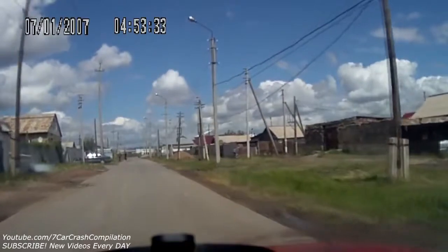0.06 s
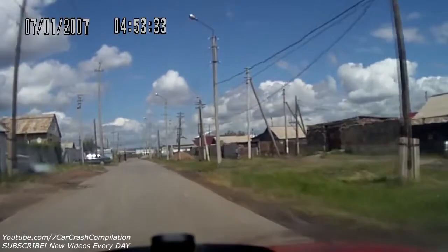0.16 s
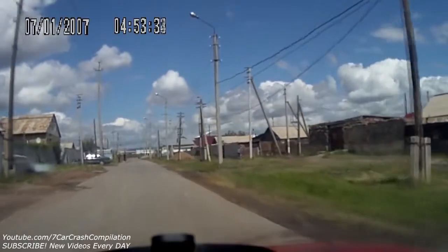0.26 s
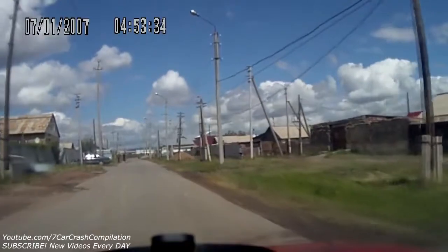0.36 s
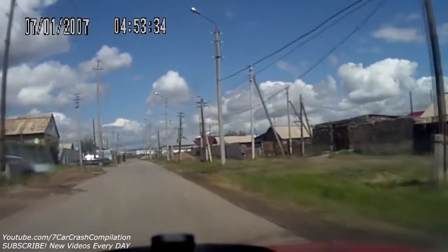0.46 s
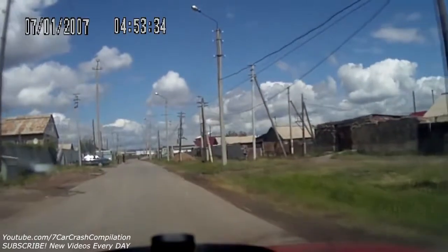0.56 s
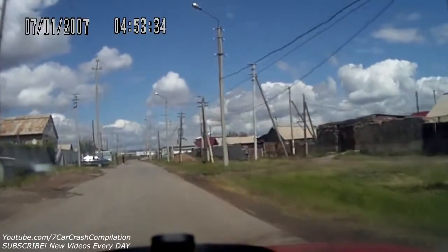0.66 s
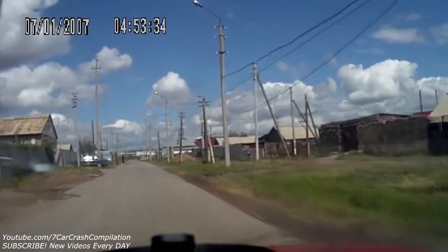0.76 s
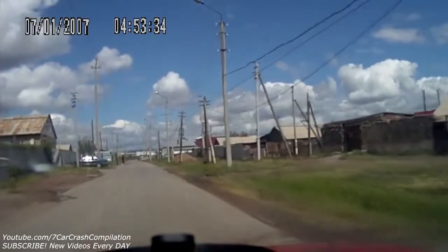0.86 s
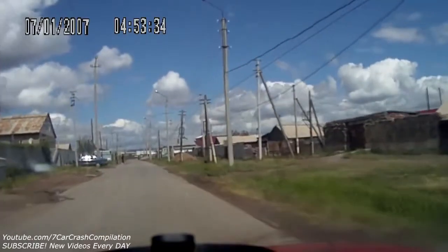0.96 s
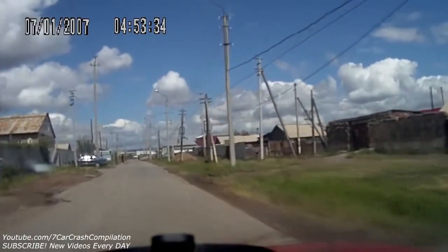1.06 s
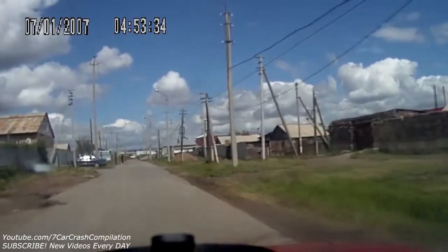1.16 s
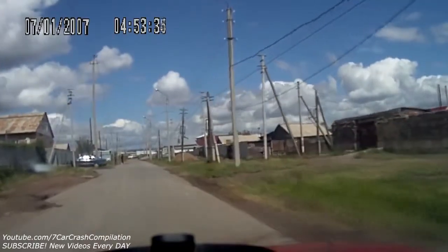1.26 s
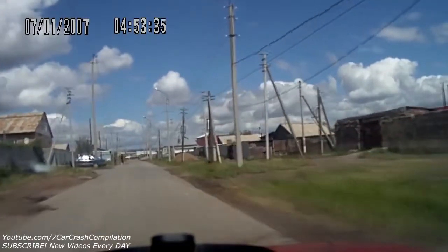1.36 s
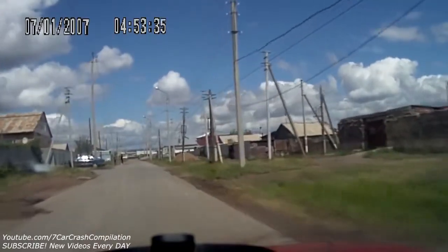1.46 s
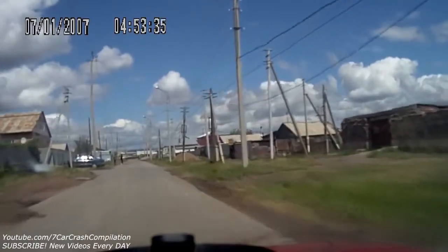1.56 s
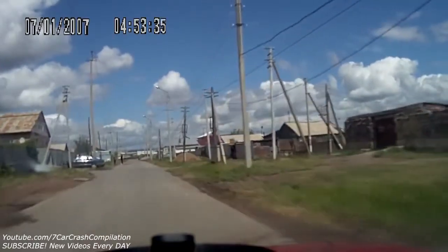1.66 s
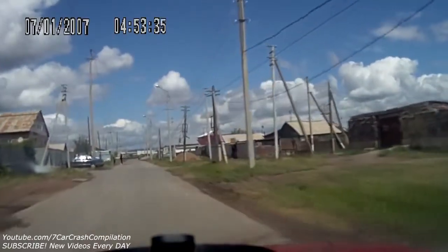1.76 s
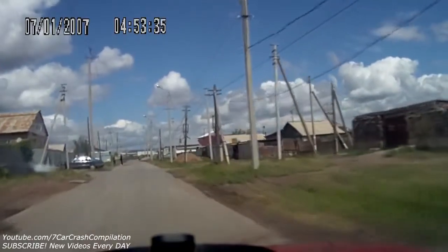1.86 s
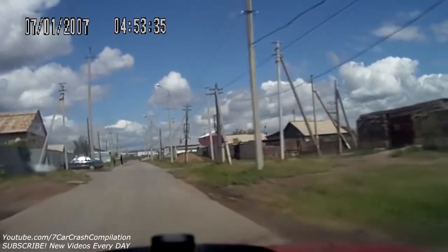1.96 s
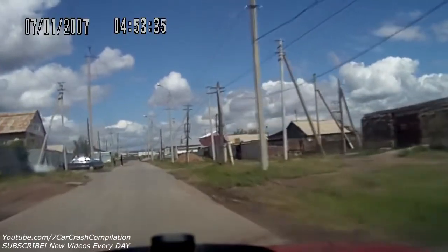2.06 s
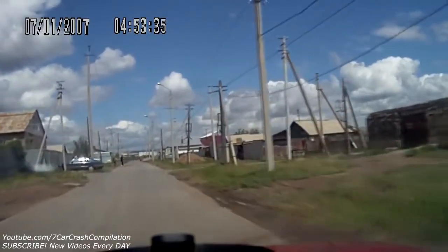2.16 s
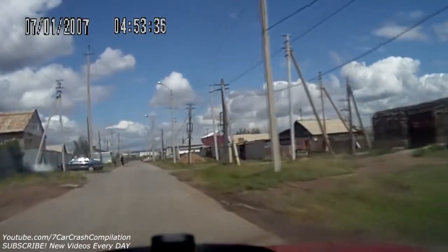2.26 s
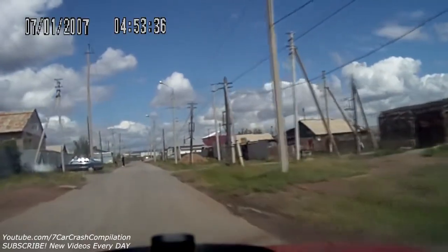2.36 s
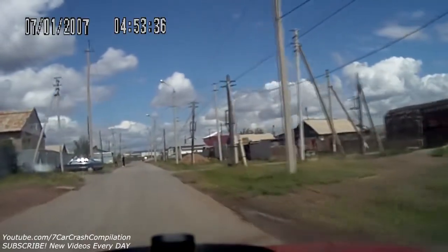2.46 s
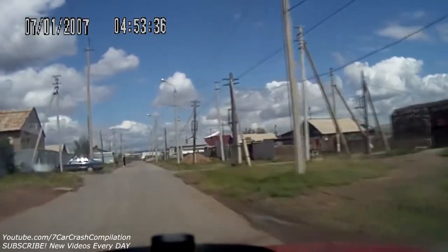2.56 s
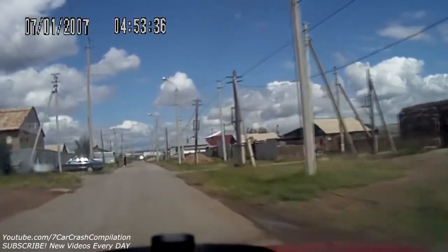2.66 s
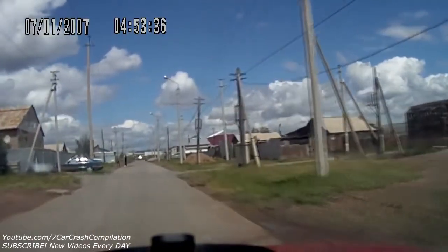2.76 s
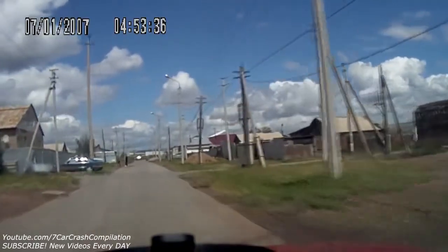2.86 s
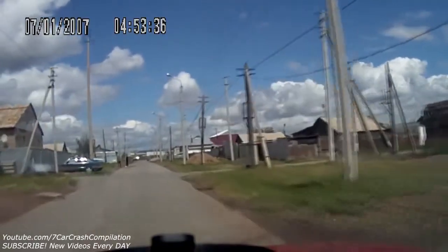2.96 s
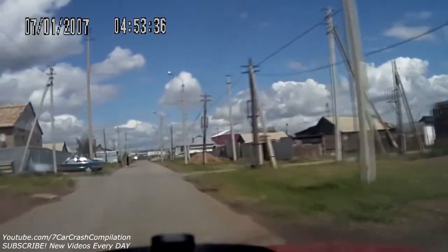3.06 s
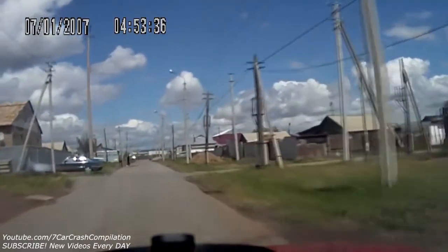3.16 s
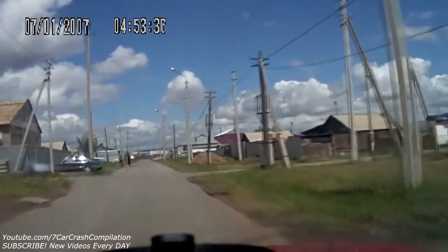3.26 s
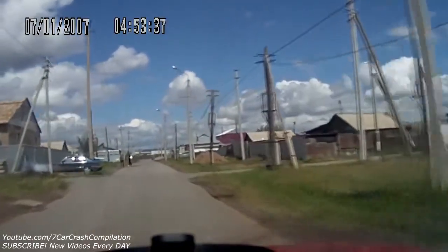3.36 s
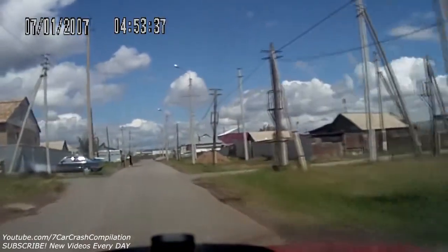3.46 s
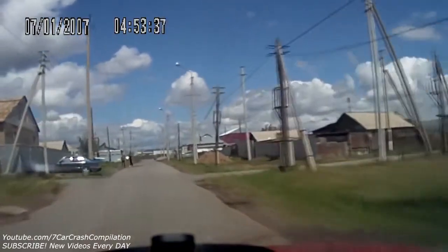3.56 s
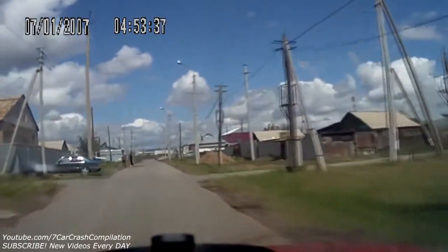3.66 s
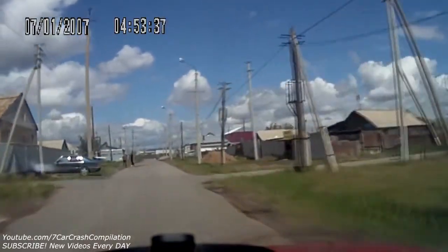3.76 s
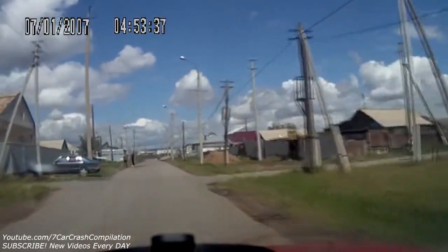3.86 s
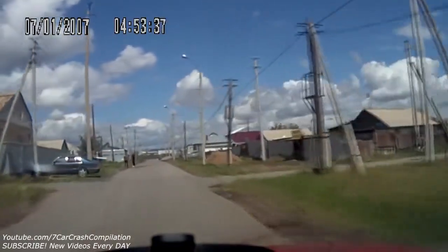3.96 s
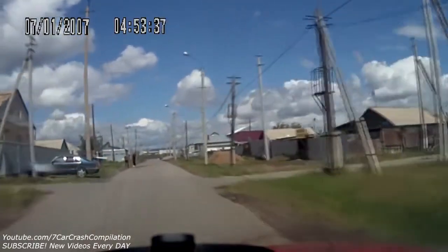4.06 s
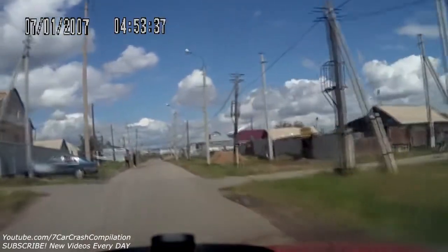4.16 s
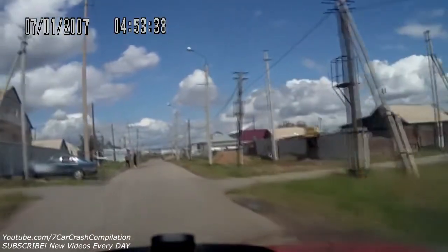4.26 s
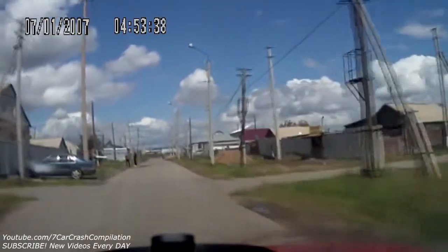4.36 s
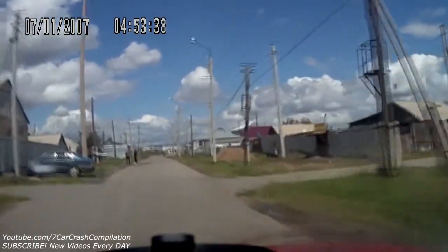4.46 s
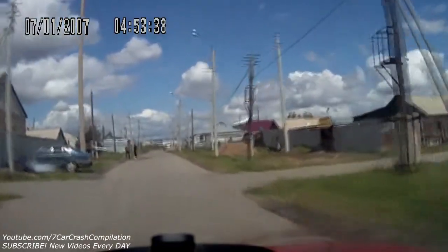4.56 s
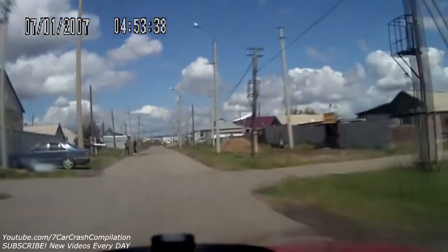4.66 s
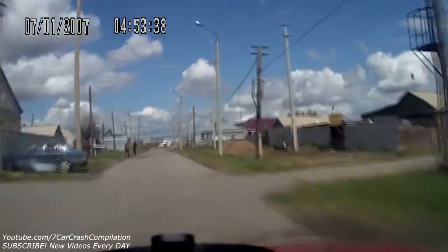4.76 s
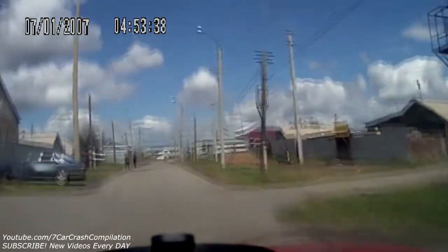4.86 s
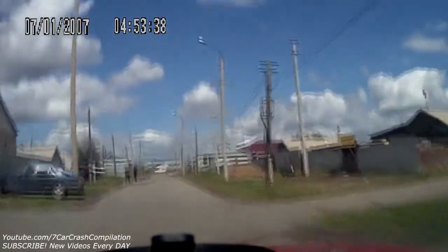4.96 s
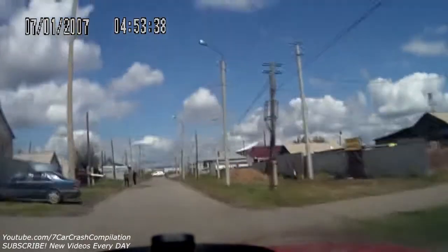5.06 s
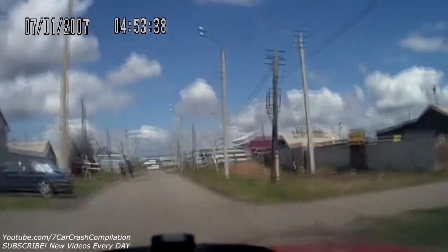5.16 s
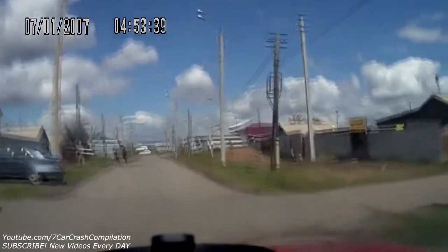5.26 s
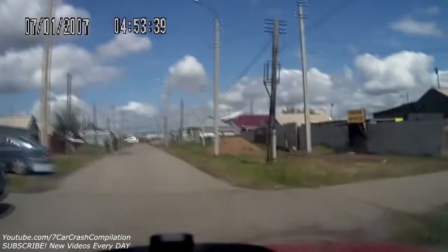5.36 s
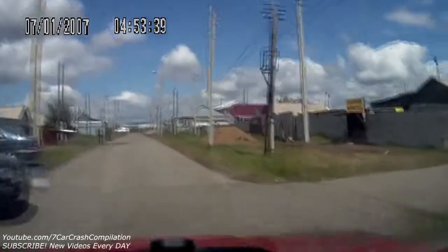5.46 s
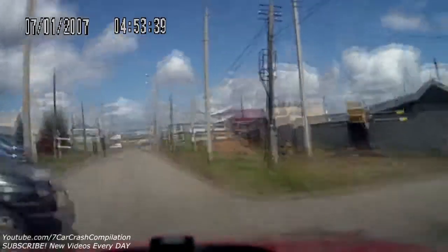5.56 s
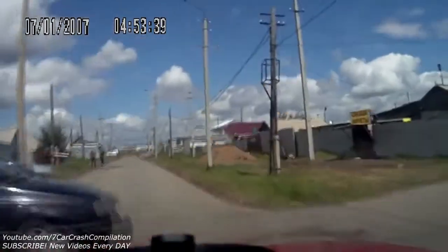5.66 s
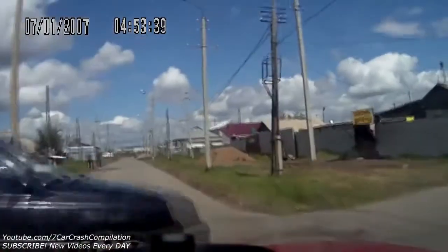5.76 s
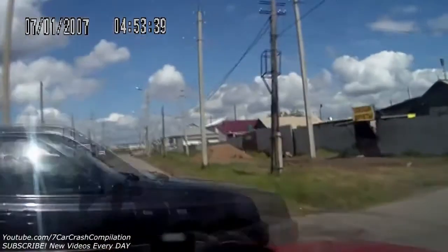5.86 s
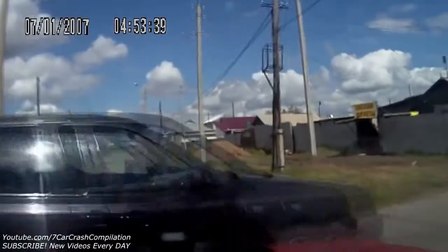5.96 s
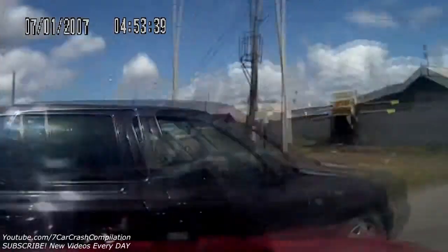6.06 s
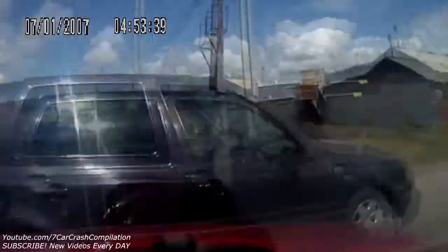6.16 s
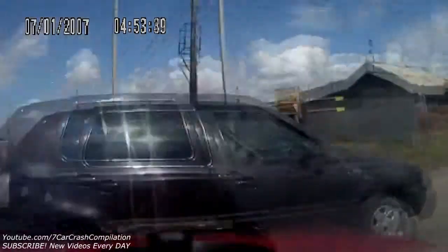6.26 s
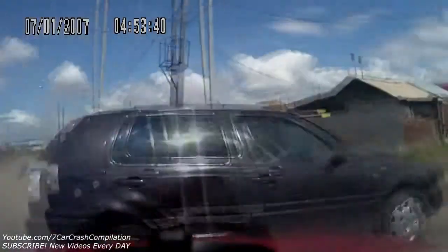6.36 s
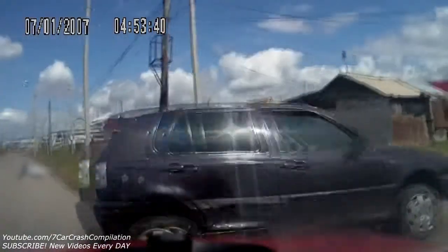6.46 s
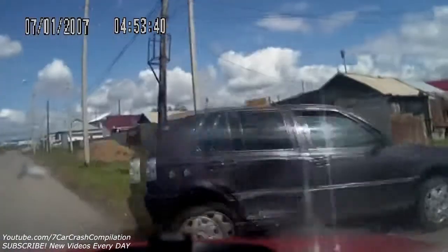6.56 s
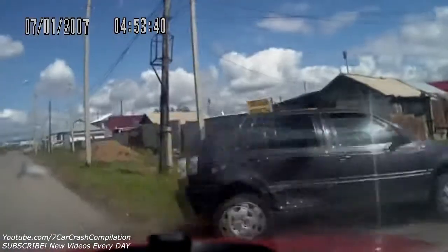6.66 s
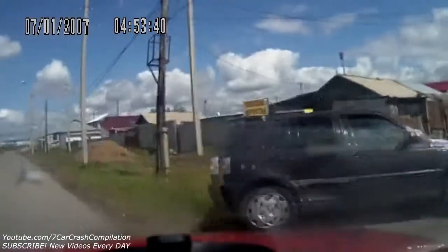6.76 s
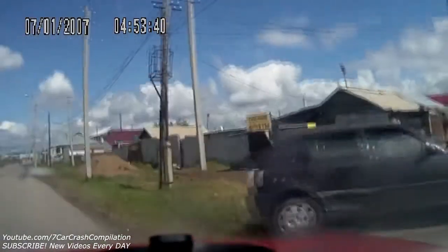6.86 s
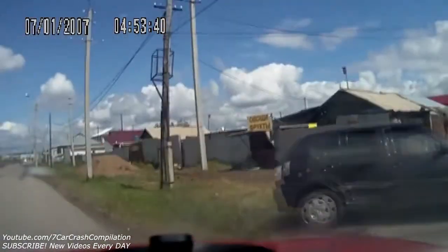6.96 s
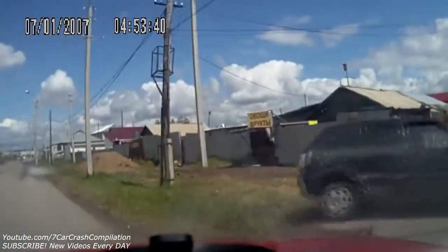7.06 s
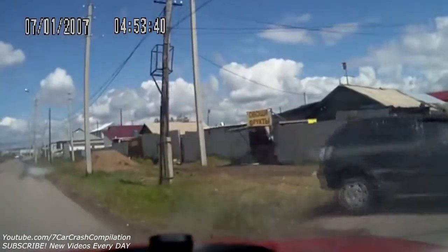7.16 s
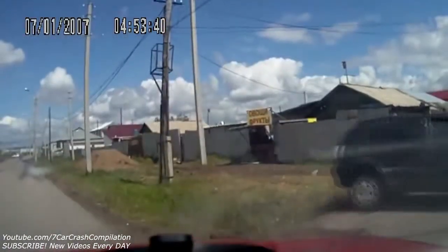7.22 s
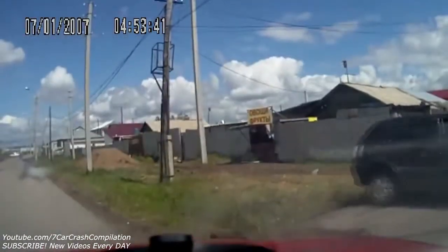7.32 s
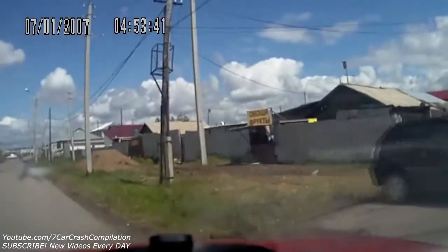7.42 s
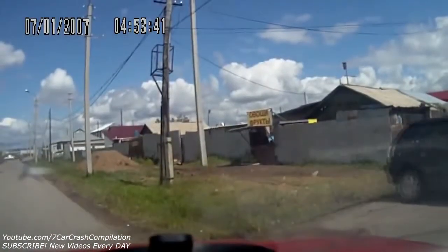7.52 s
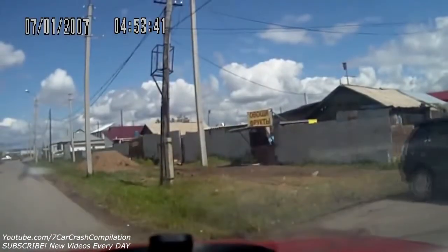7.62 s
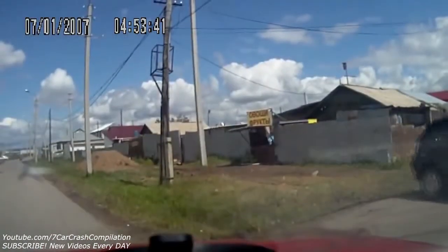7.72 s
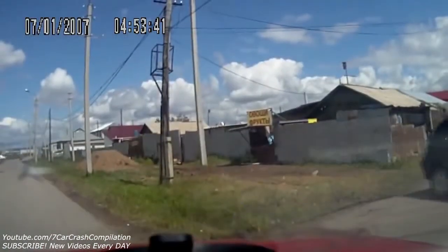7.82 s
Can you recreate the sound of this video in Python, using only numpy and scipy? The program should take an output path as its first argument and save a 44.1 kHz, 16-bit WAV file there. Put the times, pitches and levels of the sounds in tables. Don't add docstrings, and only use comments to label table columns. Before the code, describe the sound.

A droning four-cylinder engine revs higher with ticking trim, tyres scrub, sheet metal thuds and snaps, then only a weak stumbling idle remains.

```python
import sys
import numpy as np
from scipy import signal
from scipy.fft import rfft, irfft
from scipy.io import wavfile
from scipy.ndimage import uniform_filter1d

SR = 44100
rng = np.random.default_rng(int(sys.argv[2]) if len(sys.argv) > 2 else 0)


def how_loud(loudness_db):
    steps = np.asarray(loudness_db, float) / 20
    return 10 ** steps


def master_out(mix):
    frames = np.transpose(np.atleast_2d(mix))
    ceiling = np.clip(frames, -1, 1)
    pcm = np.round(ceiling * 32767).astype(np.int16)
    wavfile.write(sys.argv[1], SR, pcm)


N = 347895
TIME = np.arange(N) / SR


def engine():
    turn = [(58, 1.9, .9), (63, 2.5, 2.1), (66, 2.9, 3.7), (70, 4.2, 3.2), (78, 4.2, 3.4), (82, 3.8, 3.5),
            (87, 3.4, 3.5), (94, 4.5, 4.5)]
    # multiple, level_db (over the second multiple)
    upper = [(4, -26), (5, -20), (6, -23), (7, -25), (8, -29), (9, -36)]
    # multiple (of the firing rate), start_s, end_s, level_db
    whines = [(11.8, .95, 1.25, -56), (11.75, 1.15, 1.95, -58), (11.7, 1.75, 2.05, -52),
              (11.4, 1.98, 2.25, -50), (11.5, 2.2, 2.5, -59), (11, 2.35, 2.8, -58), (12, 2.35, 2.8, -58),
              (6.03, 3.2, 5.08, -51), (2.315, 3.3, 5.15, -38.5), (23, 2.9, 3.5, -65),
              (22.9, 1.85, 2.3, -61)]
    cabin_hz, cabin_width_hz = 208, 14

    firing_hz, first_db, second_db, uneven_db = driver()
    phase = 2 * np.pi * np.cumsum(firing_hz * (1 + .0015 * walk(12))) / SR
    turn_hz, second_rad, third_rad = np.transpose(turn)
    turn2 = np.interp(firing_hz, turn_hz, second_rad)
    turn3 = np.interp(firing_hz, turn_hz, third_rad)

    lump_db = (.4 + 3.0 * np.minimum(how_loud(uneven_db - first_db), .6)) * walk(20)
    out = how_loud(first_db + .6 + lump_db) * np.cos(phase)
    out += how_loud(second_db + 1.5) * np.cos(2 * phase + turn2)

    resonance = 1 / (1 + ((3 * firing_hz - cabin_hz) / (cabin_width_hz / 2)) ** 2)
    swell = .3 * np.clip((88 - firing_hz) / 8, .3, 1) + resonance
    out += how_loud(first_db - 20 + 1.5 * walk(8)) * swell * np.cos(3 * phase + turn3)

    halves = np.cos(1.5 * phase) + np.cos(phase / 2) / 2 + np.cos(2.5 * phase) / 5
    out += how_loud(uneven_db + 2.5 * np.clip(walk(27), -2, 1.2) + lump_db) * halves

    strain_db = np.maximum(second_db, first_db - 28 + 14 * swell)
    for multiple, db in upper:
        level = how_loud(db + 2.0 * strain_db + 23 + 1.0 * walk(9))
        out += level * np.cos(multiple * (phase + 3.48))

    for multiple, start_s, end_s, db in whines:
        level = gate(start_s, end_s, .12) * how_loud(db + 3.5 * walk(22))
        out += level * np.sin(multiple * phase + .7 * walk(40))

    boom_db = np.maximum(second_db, -29.5 + (second_db + 28) / 2)
    buzz_level = how_loud(42 + 2.6 * boom_db + 3 * first_db + .8 * walk(70))
    strikes = np.exp(-((phase / np.pi + .12) % 1) / .2) * how_loud(9.0 * np.sin(phase / 2) ** 2)
    buzz = strikes * band(band(noise(), 3300, 2600), 3600, 9000)
    return np.sqrt(2) * out + buzz_level * unit(buzz)


def driver():
    # time_s, firing_hz
    revs = [(0, 44.57), (.3, 54.44), (.58, 66.2), (.72, 63.6), (.9, 55.6), (1.0, 58.63), (1.2, 58.9),
            (2.0, 68), (2.5, 76.9), (3.0, 82.25), (3.5, 86.75), (4.75, 92), (5.02, 94.8), (5.2, 85),
            (5.33, 87), (5.42, 78.37), (5.7, 71.76), (5.8, 63.23)]
    # firing_hz, level_db
    boom = [(44, -16.5), (54.5, -16), (59, -13.5), (62, -13), (82, -12), (88, -15.5), (95, -16.5)]
    # firing_hz, level_db
    second_answer = [(44, -29.5), (63, -27), (66, -34.5), (69, -31), (74, -25), (77.5, -21.5),
                     (80.5, -25.5), (87, -40.5), (95, -45)]
    # time_s, depth_db, half_length_s
    lifts = [
        (.9, 5, 0.11),
        (1.165, 4, 0.045),
        (5.11, 8, 0.059),
        (5.385, 6, 0.025),
        (5.48, 5.5, 0.16),
        (7.08, 11.5, 0.055),
        (7.23, 9, 0.067),
        (7.555, 9, 0.04),
        (7.752, 7, 0.03),
    ]
    clutch_s, slip_db = .36, -13
    coast_s, coast_db = 5.1, -6.5
    idle_from_s, idle_fade_s, idle_sag_hz_per_s = 6.05, .09, 6.5
    idle_db, idle_fall_db_per_s = -27, 3
    idle_second_db, idle_second_fall_db_per_s = -38, 6

    after_s = np.maximum(TIME - idle_from_s, 0)
    idle = np.minimum(after_s / idle_fade_s, 1)
    firing_hz, = curves(revs)

    first_db = np.interp(firing_hz, *np.transpose(boom)) + slip_db * (1 - gate(clutch_s, 99, .0076))
    first_db += idle * (idle_db - idle_fall_db_per_s * after_s - first_db)
    first_db -= sum(depth_db * hump for depth_db, hump in swells(lifts))

    second_db = np.interp(firing_hz, *np.transpose(second_answer)) + coast_db * gate(coast_s, 99, .1)
    idle_second = idle_second_db - idle_second_fall_db_per_s * after_s + 4.2 * walk(13)
    second_db += idle * (idle_second - second_db)

    weaker_db = np.max(boom, axis=0)[1] - first_db
    uneven_db = -43 + .6741 * weaker_db - .34 * (firing_hz - 65)
    uneven_db += idle * (first_db - 5 - uneven_db)
    return firing_hz - idle_sag_hz_per_s * np.maximum(after_s - .4, 0), first_db, second_db, uneven_db


def thuds():
    # time_s, peak_db, pitch_hz, decay_s
    body = [(5.39, -6, 133, 0.084), (5.555, -9.5, 148, 0.24), (5.689, -13, 159.6, 0.15),
            (5.801, -11, 121.5, 0.14), (6.061, -1.5, 158.6, 0.083), (6.111, -9, 146, 0.055),
            (6.208, -12.5, 124, 0.12), (6.701, -12.5, 158.2, 0.19), (6.769, -23.5, 206, 0.14),
            (3.85, -13, 28.8, 0.37), (4.2, -15, 27.7, 0.4), (6.37, -16.5, 140, 0.13),
            (6.755, -11.5, 68, 0.15), (6.59, -24.5, 208, 0.23)]
    # time_s, peak_db, pitch_hz, decay_s
    knocks = [
        (5.491, -26, 457, 0.094),
        (5.787, -16, 302, 0.091),
        (5.815, -16, 394, 0.12),
        (6.031, -0.5, 299.2, 0.15),
        (6.112, -10, 347, 0.083),
        (6.21, -14, 310, 0.072),
        (6.298, -15.5, 399, 0.096),
        (6.409, -6, 480, 0.02),
        (6.729, -13.5, 380, 0.053),
    ]
    # time_s, peak_db, pitch_hz, decay_s
    rocking = [
        (6.083, -7.5, 33.23, .7),
        (6.166, -7, 40.6, .5),
        (6.246, -9, 30, 0.4),
        (6.293, -8, 27, .5),
        (6.275, -14, 170.3, 0.12),
        (6.465, -13.5, 117, 0.13),
        (6.943, -25, 70, 0.22),
        (7.0, -20, 64.7, .12),
        (7.127, -26, 62, .1),
        (7.32, -20, 66.6, 0.13),
    ]

    def ring(rows):
        out = np.zeros(N)
        for s, db, hz, t60_s in rows:
            out += decays([s], [db], [t60_s]) * np.sin(2 * np.pi * hz * (TIME - s))
        return out

    return ring(body + knocks) * how_loud(.1 + 2.2 * walk(150)) + ring(rocking)


def crush():
    # start_s, end_s, level_db, centre_hz
    folds = [
        (6.025, 6.082, -13.5, 410),
        (6.104, 6.16, -25.5, 500),
        (6.175, 6.234, -22, 650),
        (6.285, 6.34, -26, 600),
        (6.33, 6.5, -42, 500),
        (5.7, 5.752, -36, 800),
        (5.804, 5.863, -35, 900),
        (5.887, 5.947, -36.5, 890),
    ]
    out = np.zeros(N)
    for start_s, end_s, db, hz in folds:
        crunch = band(band(grit(250, 3.1), hz, hz), hz, 2 * hz)
        out += how_loud(db) * gate(start_s, end_s, .028) * unit(crunch)
    return out


def cracks():
    # time_s, peak_db, width_ms, treble_db (over peak)
    slips = [(5.183, -45, 13, -35), (5.2123, -33, 3, -40), (5.354, -10, 3, -12.5), (5.392, -35, 25, -31),
             (5.4398, -19.5, 1.5, -20), (5.445, -21, 0.85, -23), (5.4498, -23, 3.2, -24),
             (5.462, -32.5, 36, -10.5), (5.4922, -25.5, 2.3, -29), (5.5502, -27.5, 8.3, -21),
             (5.565, -14, 0.61, -11), (5.621, -14, 1.9, -17), (5.6302, -19.5, 2, -22),
             (5.647, -18.5, 1.8, -15), (5.6578, -26, 1.77, -21), (5.64, -27, 2.4, -20),
             (5.67, -29, 2.6, -23), (5.774, -32, 2.9, -5), (5.792, -29, 13, -35)]
    # time_s, peak_db, width_ms, treble_db (over peak)
    crumples = [(6.0366, -28.5, 12.1, -7.5), (6.0562, -30, 3.2, -6), (6.0665, -21.5, 6.4, -9),
                (6.0966, -23, 1.8, -4.5), (6.1122, -23, 2.1, -17), (6.1175, -21, 3.9, -15),
                (6.133, -9, 5.8, -16), (6.1429, -9.5, 2, -8), (6.148, -8, 5.6, -20), (6.158, -22, 2.3, -9),
                (6.1855, -25, 3.9, -11), (6.199, -18, 10, -31), (6.2158, -20, 2.2, -28),
                (6.2464, -16, 1.5, -30), (6.2986, -10.5, 5.3, -26), (6.3045, -9, 1.02, -19),
                (6.3094, -3.5, 2.3, -28), (6.3143, -11.5, 4, -10), (6.355, -37, 30.4, 1),
                (6.3773, -30, 1.3, -10), (6.4081, -25, 8.6, -7.5), (6.4226, -35.5, 27, 1.5),
                (6.451, -29, 5.2, -8), (6.464, -28.5, 6, 0), (6.4724, -20.5, 4.2, -47),
                (6.4803, -21.5, 1.1, -18), (6.497, -33, 2.1, -7), (6.5186, -34, 5.1, -21)]
    # time_s, peak_db, width_ms, treble_db (over peak)
    drops = [(6.575, -42, 4.9, 1), (7.305, -59, 4.3, 5), (7.584, -47.5, 4, -2), (6.7279, -8.5, 3.6, -21),
             (6.7341, -9, 2, -29), (6.7383, -12, 1.7, -31), (6.766, -13, 0.72, -21),
             (6.7706, -13.5, 3.74, -33), (6.7772, -15.5, 2.7, -22), (6.8351, -42, 4.5, -9),
             (6.8508, -37, 24, -18), (6.88, -32, 16, -34), (6.8932, -34, 2.6, -28), (7.029, -40.5, 9, -6),
             (7.099, -41, 1.8, -6), (7.4256, -42, 11, -3.5), (7.439, -43, 3.4, -11), (7.314, -58, 2.7, 7),
             (7.632, -56, 6, 2)]
    snap_hz, snap_spread = 3200, .12

    s, db, ms, high_db = np.transpose(slips + crumples + drops)
    hz = snap_hz * np.exp(snap_spread * np.clip(rng.standard_normal(len(s)), -2, 2))
    low_db = -6 + .2088 * (db.max() - db)
    mid = band(band(grit(1500, 1.6), 2180, 1970), 2100, 2900)
    low = band(band(noise(), 550, 1500), 590, 1700)
    high = sum(band(band(noise(), top_hz, 1500), top_hz, 3600) for top_hz in (6400, 10000))

    out = bumps(s, db - 2.5, ms) * unit(mid)
    out += pings(s, db - 6.5, ms, hz, 850)
    out += bumps(s, db + low_db - .6, 1.35 * ms) * unit(low)
    return out + bumps(s, db + high_db - .6, ms) * unit(high)


def metal():
    # pitch_hz, start_s, end_s, level_db
    rings = [
        (1690, 6.16, 6.5, -35),
        (1782, 6.2, 6.48, -37),
        (3644, 6.23, 6.28, -43),
        (4718, 6.19, 6.49, -44),
        (4718, 6.195, 6.3, -37),
        (7375, 6.18, 6.3, -45),
        (3700, 7.02, 7.042, -41),
        (3520, 4.178, 4.204, -56),
        (3450, 4.935, 4.96, -55),
        (12550, 6.49, 6.535, -55),
    ]
    out = np.zeros(N)
    for hz, start_s, end_s, db in rings:
        out += gate(start_s, end_s, .013) * how_loud(db + 2.0 * walk(90)) * np.sin(2 * np.pi * hz * TIME)
    return out


def ticks():
    # time_s, peak_db, resonance_hz, width_ms
    trim = [(0.1604, -38, 2900, 2.4), (0.167, -41, 3200, 1.4), (0.179, -48, 3980, 5),
            (0.212, -56, 2000, 6.2), (0.337, -47, 2120, 3.4), (1.017, -51, 4500, 2),
            (3.514, -52, 5500, 1.5), (4.043, -54, 3800, 5.15), (1.563, -48.5, 4000, 3),
            (1.1693, -40, 3800, 2.5), (1.275, -55, 4000, 8), (1.6409, -43, 2800, 2.7),
            (1.659, -45, 4500, 2.2), (1.773, -52, 4860, 5), (1.7841, -40, 2700, 10),
            (1.799, -41, 2192, 2.5), (1.9035, -42.5, 3900, 1.8), (1.9604, -48, 2500, 2.26),
            (2.3249, -43, 1688, 3.8), (2.779, -51, 2515, 3.1), (2.8052, -45, 3480, 2.1),
            (2.8299, -47, 2600, 2.9), (2.9414, -46, 3200, 2.26), (3.58, -55, 4000, 22),
            (3.609, -54.5, 4000, 12), (3.8363, -45, 4010, 3.4), (3.922, -49, 3900, 6.7),
            (4.13, -60.5, 2500, 4.06), (4.6112, -51, 5024, 6.3), (4.7914, -49, 2970, 3.24),
            (4.87, -50.5, 3100, 4.9), (4.9457, -49.5, 3300, 5.8), (5.395, -32, 2300, 14),
            (5.444, -23.5, 1250, 5.5)]
    # time_s, peak_db
    taps = [
        (0.11, -48),
        (0.27, -49),
        (0.2994, -55),
        (0.3257, -50),
        (0.3839, -46.5),
        (0.4713, -51.5),
        (0.4809, -49),
        (0.5173, -49),
        (1.705, -49),
    ]
    # time_s, peak_db, resonance_hz
    clunks = [(0.159, -40, 867), (0.21, -38.5, 896), (0.47, -40, 638), (0.517, -40.5, 622),
              (1.512, -43, 735), (1.703, -41, 668), (2.74, -38, 719), (2.778, -39, 676),
              (2.963, -37.5, 694), (3.851, -39, 600), (3.884, -38, 921), (4.129, -45, 659),
              (4.789, -38, 684), (5.388, -25.5, 1030), (5.754, -28, 764), (6.516, -23.5, 756),
              (6.892, -28, 721), (7.076, -36, 1400)]
    # start_s, length_s, level_db, centre_hz
    scrapes = [(0.018, 0.011, -33.5, 3700), (0.031, 0.036, -44, 3630), (0.137, 0.05, -59, 4500),
               (0.191, 0.051, -62, 3000), (0.256, 0.06, -63, 3200), (1.017, 0.038, -62, 4000),
               (1.07, 0.038, -61, 3580), (1.25, 0.049, -59.5, 3970), (1.294, 0.087, -63, 3580),
               (1.756, 0.054, -47, 3700), (3.5, 0.19, -61.5, 3600), (3.832, 0.08, -66, 3700),
               (4.175, 0.02, -55.5, 3580), (5.49, 0.022, -35, 2498), (5.602, 0.06, -38, 2200),
               (6.811, 0.052, -43.5, 2980), (7.373, 0.079, -48.5, 4000), (7.375, 0.076, -59, 12000)]
    tap_hz, tap_ms, clunk_ms = 2600, 2, 3.4

    s, db, hz, ms = np.transpose(trim + [(tap_s, tap_db, tap_hz, tap_ms) for tap_s, tap_db in taps])
    out = bumps(s, db - 4.5, ms) * unit(band(noise(), 1500, 980))
    out += pings(s, db - 2.5, ms, hz, 800)
    out += bumps(s, db - 23.5, ms) * unit(band(noise(), 10000, 6900))

    s, db, hz = np.transpose(clunks)
    out += pings(s + .0023, db - 2.5, clunk_ms + 0 * s, hz, 600)

    highpass = signal.butter(3, 1800, "high", fs=SR, output="sos")
    for start_s, length_s, db, hz in scrapes:
        rasp = signal.sosfilt(highpass, grit(430, 2.2))
        out += how_loud(db) * gate(start_s, start_s + length_s, .011) * unit(band(rasp, hz, .46 * hz))
    return out


def road():
    # pitch_hz, width_hz, level_db
    pan_modes = [
        (105.6, 50, -3.5),
        (149.7, 34, -1.5),
        (212, 42, -9.5),
        (279, 71, -12.5),
    ]
    # pitch_hz, density_db (per Hz)
    roar_spectrum = [(210, -25.5), (350, 0), (532, -3.5), (638, -5.5), (1000, -6.5), (1270, -12.5),
                     (2250, -19.5), (2500, -35), (3250, -58), (5500, -120)]
    # pitch_hz, density_db (per Hz)
    rustle_spectrum = [(880, -28.5), (1500, -3), (1900, -0.5), (2690, -5.5), (3350, -1), (7920, -21.5),
                       (9560, -22), (12500, -28.5), (14500, -28), (16000, -48.5)]
    # pitch_hz, density_db (per Hz)
    hiss_spectrum = [(880, -31), (1500, -2.5), (1620, -4.5), (2270, -1.5), (2660, -18.5), (3480, -18.5),
                     (5660, -24), (11700, -20), (12900, -36.5), (13900, -26), (16000, -59)]
    settle_s = 6.9

    heave_db, drum_db, roar_db, rustle_db = chassis()
    heave = unit(band(band(noise(), 32, 26), 40, 36))
    drum = np.zeros(N)
    for hz, width_hz, db in pan_modes:
        drum += how_loud(db + 2.4 * walk(11)) * unit(band(band(noise(), hz, width_hz), hz, 2 * width_hz))
    roar = how_loud(.83 * walk(25)) * colour(grit(200, 2.1), roar_spectrum)
    rustle = how_loud(2.0 * walk(60)) * colour(grit(900, 2.9), rustle_spectrum)
    still = gate(settle_s, 99, .1) * .75
    rustle = (1 - still) * rustle + still * 1.3 * colour(noise(), rustle_spectrum)

    out = how_loud(heave_db) * heave + how_loud(drum_db + 5.5) * unit(drum)
    out += how_loud(roar_db) * roar + how_loud(rustle_db - 1.5) * rustle
    return out + how_loud(-66.0) * colour(noise(), hiss_spectrum)


def chassis():
    # time_s, shake_db
    shake_curve = [(0, -52.5), (1.0, -51.5), (2.2, -46), (2.55, -42.5), (2.9, -46), (5.12, -44.5),
                   (5.5, -39), (5.65, -38), (5.97, -40.5), (6.1, -24), (6.25, -27), (6.4, -31.5),
                   (6.58, -41.5), (6.8, -41.5), (7.0, -45), (7.15, -51.5), (7.35, -47.5), (7.88, -54)]
    # time_s, peak_db, half_length_s
    jolts = [
        (0, -35, 0.27),
        (3.9, -25, 0.08),
        (4.25, -28.5, 0.13),
        (4.92, -31, 0.13),
        (5.45, -20, 0.13),
        (5.73, -18.5, 0.16),
        (6.17, -22, 0.073),
        (6.4, -20, 0.08),
        (6.55, -26, 0.068),
        (7.0, -46, 0.062),
    ]
    rolling_db = -46
    heave_db, drum_db, rustle_db, loose_db = -33, -38, -61, -48
    loose_s = 5.01
    stop_s, stop_db = 6.79, -10
    skid_s, skid_end_s, skid_db = 5.58, 6.02, 5.5

    shake_db, = curves(shake_curve)
    more_db = shake_db - rolling_db
    stopped, loose = gate(stop_s, 99, .51), gate(loose_s, 99, .47)
    skid = skid_db * gate(skid_s, skid_end_s, .017)
    heave = how_loud(heave_db + stop_db * stopped) + sum(how_loud(db) * hump for db, hump in swells(jolts))
    drum = drum_db + .6432 * (more_db + skid) + stop_db * stopped
    rustle = (1 - loose) * (rustle_db + .77 * more_db) + loose * (loose_db + .7542 * more_db)
    return 20 * np.log10(heave), drum, shake_db + skid, rustle


def cabin(x):
    t60_s, wet_db = .069, -16
    t = TIME[:int(.15 * SR)]
    tail = rng.standard_normal(len(t)) * how_loud(-60 * t / t60_s)
    return x + how_loud(wet_db) * signal.fftconvolve(x, tail / np.sqrt(np.sum(tail ** 2)))[:N]


def noise():
    return rng.standard_normal(N)


def grit(rate_hz, spread_db):
    k = int(SR / rate_hz)
    grains = np.minimum(rng.exponential(size=N // k + 1), 3)
    return unit(how_loud(spread_db * np.repeat(grains, k)[:N]) * noise())


def walk(rate_hz):
    k = int(SR / rate_hz)
    steps = np.repeat(rng.standard_normal(N // k + 1), k)
    return 1.385 * uniform_filter1d(uniform_filter1d(steps, k), k)[:N]


def band(x, hz, width_hz):
    return signal.lfilter(*signal.iirpeak(hz, hz / width_hz, fs=SR), x)


def colour(x, points):
    hz, db = np.transpose(points)
    log_hz = np.log(np.arange(N // 2 + 1) * SR / N + 1)
    return unit(irfft(rfft(x) * how_loud(np.interp(log_hz, np.log(hz), db, left=-90, right=-90)), N))


def unit(x):
    return x / np.sqrt(np.mean(x ** 2))


def curves(table):
    s, *columns = np.transpose(table)
    return [np.interp(TIME, s, column) for column in columns]


def gate(start_s, end_s, ramp_s):
    return np.clip(np.minimum(TIME - start_s, end_s - TIME) / ramp_s, 0, 1)


def swells(rows):
    return [(value, np.exp(-np.abs((TIME - s) / half_s) ** 2)) for s, value, half_s in rows]


def decays(times_s, dbs, t60s):
    env = np.zeros(N)
    for s, db, t60_s in zip(times_s, dbs, np.clip(t60s, .004, .9)):
        i = int(s * SR)
        t = TIME[:min(int(t60_s * SR), N - i)]
        env[i:i + len(t)] += how_loud(db - 60 * t / t60_s) * np.minimum(t / .00089, 1)
    return env


def bumps(times_s, dbs, widths_ms):
    env = np.zeros(N)
    for s, db, ms in zip(times_s, dbs, widths_ms):
        i = slice(max(int((s - .03) * SR), 0), int((s + .05) * SR))
        t = (TIME[i] - s) / (ms / 2000)
        env[i] += how_loud(db - 9.6 * np.abs(np.where(t > 0, t / 1.1, t)) ** 1.15)
    return env


def pings(times_s, dbs, widths_ms, hzs, width_hz):
    out, source = np.zeros(N), noise()
    for s, db, ms, hz in zip(times_s, dbs, widths_ms, hzs):
        i = slice(max(int((s - .03) * SR), 0), int((s + .064) * SR))
        out[i] += bumps([s], [db], [ms])[i] * unit(band(source[i], hz, width_hz))
    return out


def scene():
    mix = engine() + thuds() + crush() + metal() + cabin(cracks() + ticks()) + road()
    return (mix * gate(0, TIME[-1], .004))[None]


def low_pass(x):
    return signal.sosfilt(signal.butter(12, 16380, fs=SR, output="sos"), x)


def record(dry):
    flat = np.clip(dry, -.42, .42)
    lowpass = signal.ellip(8, .2, 60, 15600, fs=SR, output="sos")
    return low_pass(signal.sosfilt(lowpass, flat))


dry = scene()
out = record(dry)
master_out(out)
```